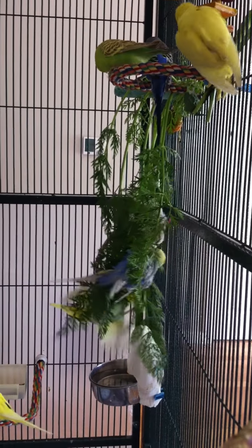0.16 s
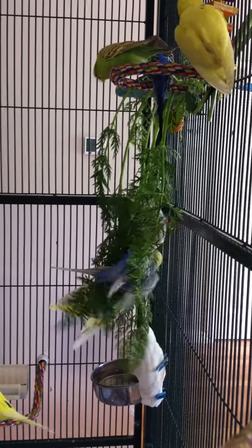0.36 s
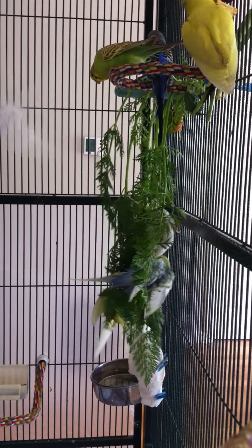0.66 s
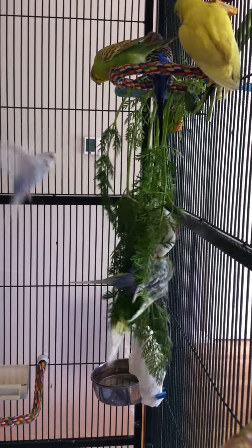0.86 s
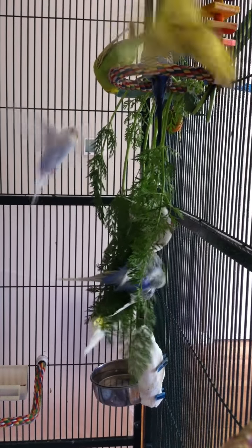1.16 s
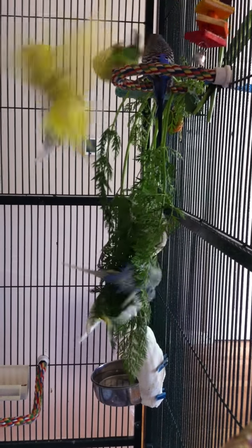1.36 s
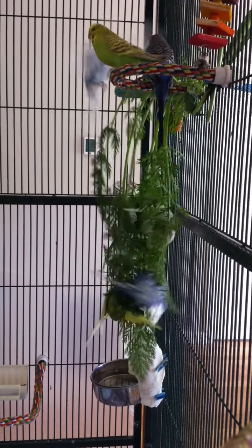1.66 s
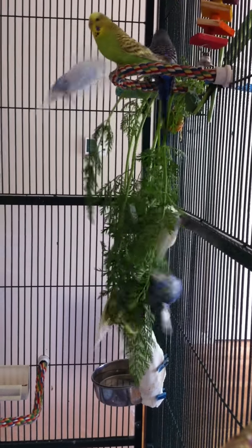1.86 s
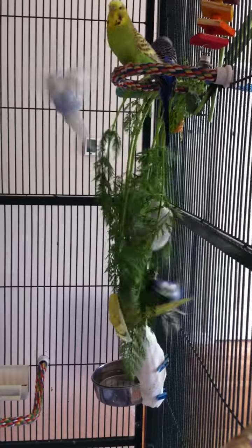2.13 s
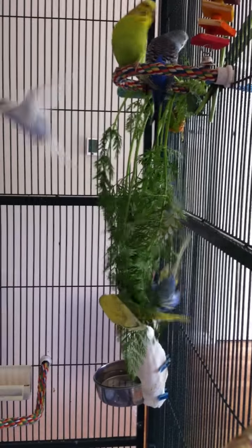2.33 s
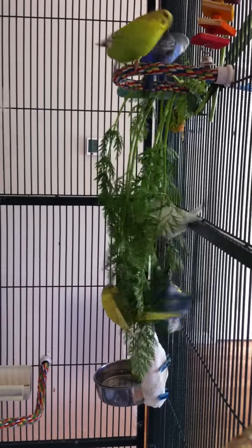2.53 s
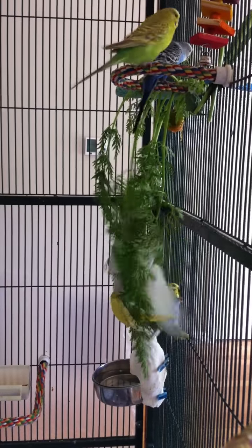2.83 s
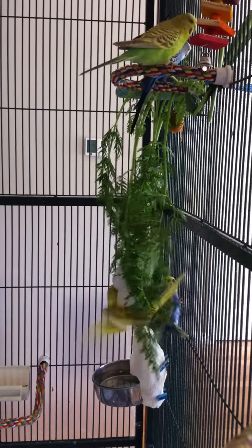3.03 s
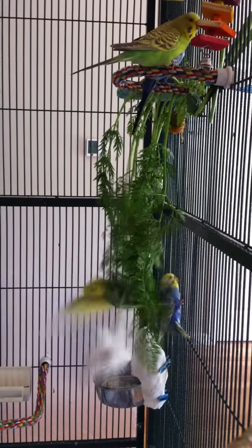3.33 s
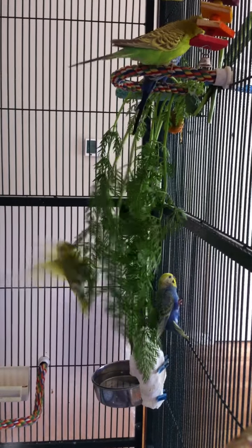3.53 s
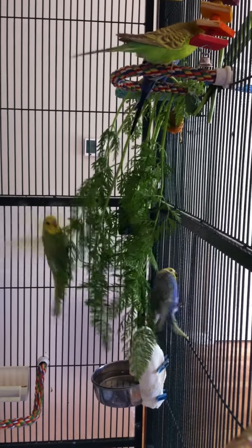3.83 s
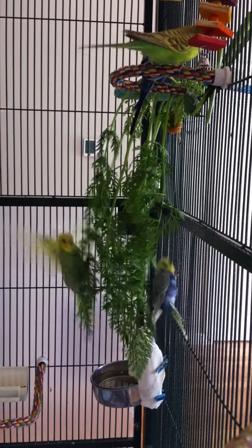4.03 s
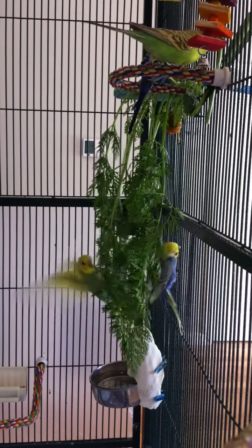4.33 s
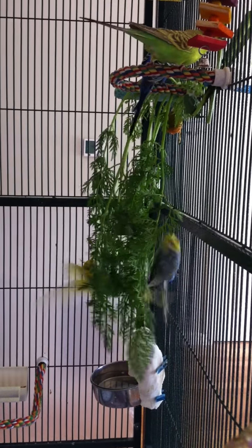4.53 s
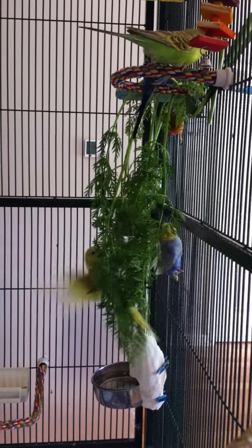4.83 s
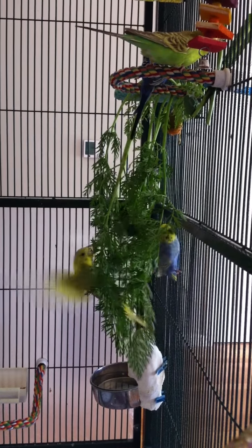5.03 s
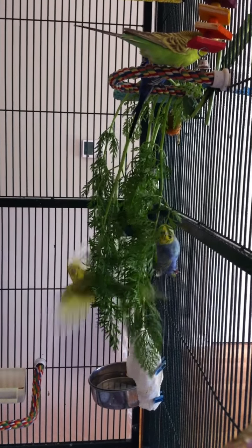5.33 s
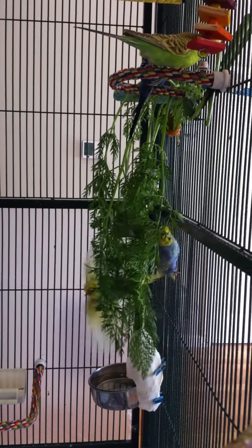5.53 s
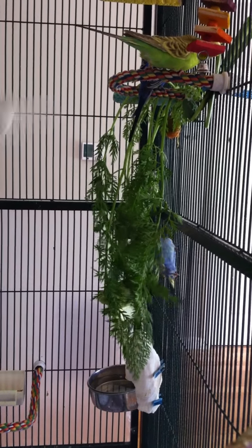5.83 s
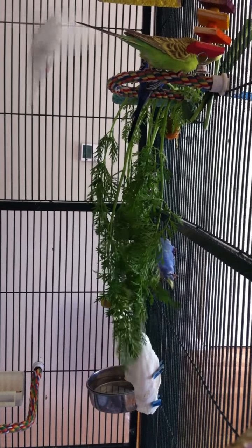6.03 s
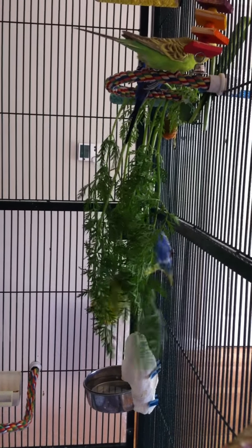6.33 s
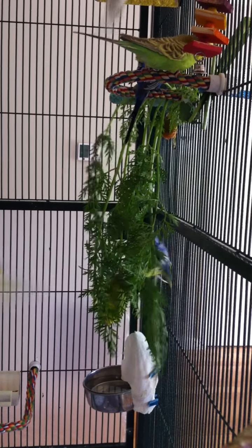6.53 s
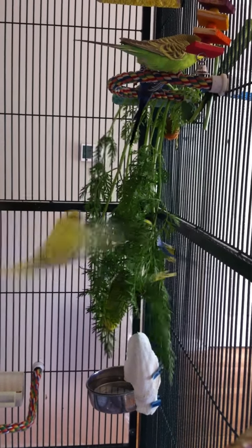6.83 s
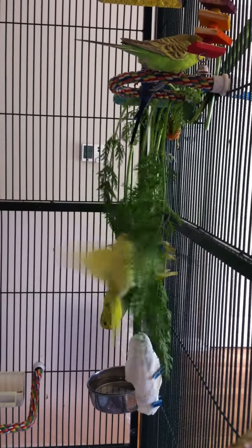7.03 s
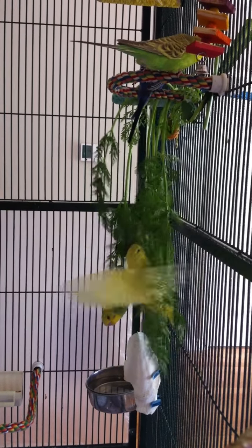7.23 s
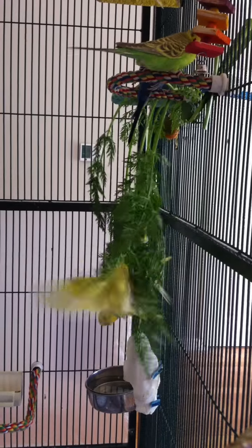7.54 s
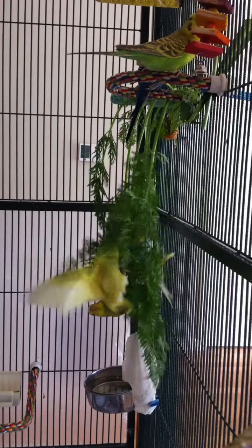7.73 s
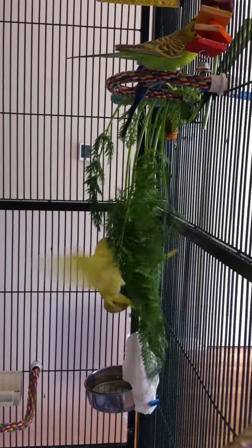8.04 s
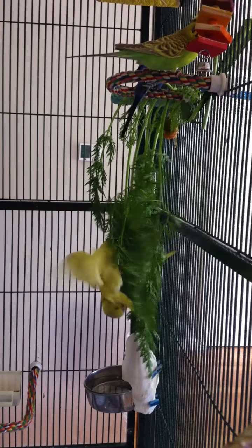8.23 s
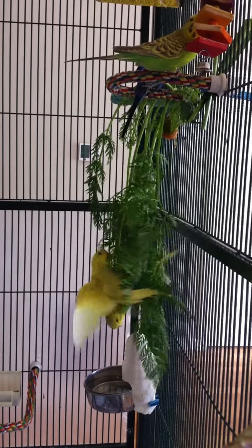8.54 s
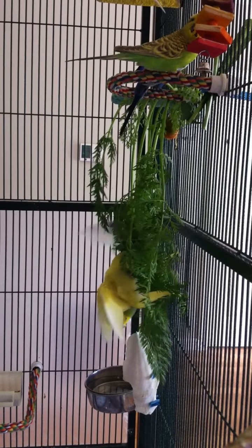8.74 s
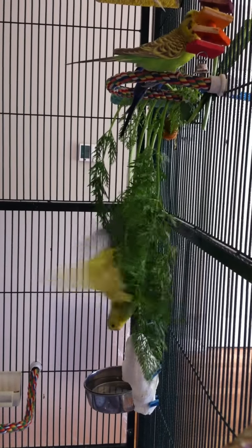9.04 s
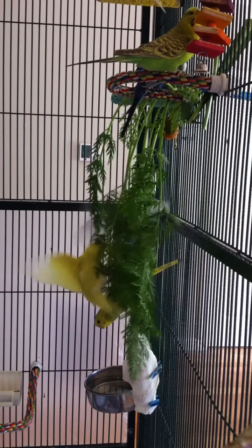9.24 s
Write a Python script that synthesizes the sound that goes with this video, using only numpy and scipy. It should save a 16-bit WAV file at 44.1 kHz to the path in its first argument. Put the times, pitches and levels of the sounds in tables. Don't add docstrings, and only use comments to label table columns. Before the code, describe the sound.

In a bare, ringing room, small parakeets scramble over hanging leaves in a wire cage, above faint room noise and a low appliance hum. It starts quietly with claw ticks; from 0.5 s wings puff and flutter, slapping leaves and bars as the foliage hisses and crackles. A longer whirr runs from about 1.5 to 2.4 s, with faint distant peeps. At 3.3 s come four quick, harsh yaps, then a strong wing burst and sharp slap near 3.7 s. Bright, fast-warbling whistles sound at 4.1, 4.3 and 4.9 s. Fluttering surges around 5.6 s with the hardest slap, followed by light ticks past 6 s. Two more whistles come at 7.0 and 7.25 s, then a low peep and scratchy farther call around 7.7 to 7.9 s. Soft low peeps follow at 8.6 s; the rustle thins, then a last flutter stirs at 9.2 s.

```python
import sys
import numpy as np
from scipy import signal
from scipy.fft import rfft, irfft
from scipy.io import wavfile
from scipy.ndimage import uniform_filter1d

SR = 44100
rng = np.random.default_rng(int(sys.argv[2]) if len(sys.argv) > 2 else 0)


def ratio_of_db(decibels):
    return 10 ** (np.asarray(decibels, float) / 20)


def waveform_to_disk(signal):
    frames = np.transpose(np.atleast_2d(signal))
    scaled = np.clip(frames, -1, 1) * 32767
    samples = np.round(scaled).astype(np.int16)
    wavfile.write(sys.argv[1], SR, samples)


N = 413658

# frequency in Hz, gain in dB.
THROAT_GAIN = [(300, -46.5), (900, -23.5), (1500, -15.5), (2500, 2), (3600, 2.5), (4500, -8.5),
               (7000, -1.5), (9000, -5.5), (10500, -8.5), (12300, -9.5), (14500, 9), (18000, -5)]
# time in seconds, level in dB.
LEAF_BUSTLE = [(0, -71), (.48, -72), (.59, -66.5), (.73, -66), (.86, -60.5), (2.4, -59), (3.12, -62),
               (3.23, -57.5), (3.9, -58), (4.06, -63.5), (5.58, -69), (5.69, -64.5), (5.9, -65.5),
               (6.98, -65), (8.1, -69.5), (8.68, -75), (8.98, -74.5), (9.38, -68)]


def rms_one(x):
    return x / np.sqrt(np.mean(x ** 2) + 1e-20)


def in_time(rows):
    s, *columns = np.transpose(rows)
    return [np.interp(np.arange(N) / SR, s, c) for c in columns]


def at_hz(points, hz):
    log_hz, gain = np.log(np.array(points)[:, 0]), np.array(points)[:, 1]
    return np.interp(np.log(hz + 1), log_hz, gain)


def drift(rate, size=N):
    r = np.exp(-2 * np.pi * rate / SR)
    noise = rng.standard_normal(size + 20000)
    return rms_one(signal.lfilter([1], [1, -2 * r, r * r], noise)[20000:])


def coloured(x, spectrum):
    hz = np.arange(N // 2 + 1) * SR / N
    return rms_one(irfft(rfft(x) * ratio_of_db(at_hz(spectrum, hz)), N))


def band(x, low_hz, high_hz):
    return signal.sosfilt(signal.butter(2, [low_hz, high_hz], "band", fs=SR, output="sos"), x)


def voice(calls, tract, second_db, slope_db, breath_db):
    break_db = -5
    out = np.zeros(N)
    wobble = np.tanh(drift(410))
    stutter = np.abs(drift(110))
    fray = np.tanh(drift(180))
    air = ratio_of_db(breath_db) * coloured(rng.standard_normal(N), tract)
    for notes in calls:
        s, length, from_hz, to_hz, effort_db, flutter = np.transpose(notes)
        knots = np.ravel([s, s + length], "F")
        at = np.arange(int(s[0] * SR) - 200, int(knots[-1] * SR) + 200)
        t = at / SR
        rough = np.interp(t, knots, np.repeat(np.clip(flutter, .15, 1), 2))
        glide = np.interp(t, knots, np.ravel([from_hz, to_hz], "F"))
        hz = signal.lfilter([.03], [1, -.97], glide, zi=[from_hz[0]])[0]
        hz = hz * (1 + .12 * rough * wobble[at])
        shake_db = 25 * rough * (.6 - stutter[at])
        held = uniform_filter1d(1. * (np.searchsorted(knots, t) % 2), size=90)
        edge = np.clip((t - t[0]) / 0.012, 0, 1) ** 0.58 * np.clip((t[-1] - t) / 0.011, 0, 1)
        push_db = np.interp(t, knots, np.repeat(effort_db, 2)) + 3.0
        level = ratio_of_db(push_db + shake_db + break_db * (1 - held)) * edge
        phase = 2 * np.pi * np.cumsum(hz) / SR
        tone = air[at]
        for k in range(1, 9):
            tilt_db = 0
            if k > 1:
                tilt_db = second_db * np.clip(hz / 2600, .3, 1) + slope_db * (k - 2)
                tilt_db = tilt_db - 9.0 * (k - 1) * (rough - .15) + 7 * fray[at - 3000 * k]
            tone = tone + ratio_of_db(tilt_db + at_hz(tract, k * hz)) * (k * hz < 17000) * np.sin(k * phase)
        out[at] += level * tone
    return out


def sung(tune, calls):
    fall_flutter = 0.23
    return [[(s + at * slow, length * slow, a * high, b * high, db + effort_db,
              flutter + fall_flutter * max(1 - b / a, 0))
             for at, length, a, b, effort_db in tune]
            for s, slow, high, db, flutter in calls]


def facing_calls():
    # seconds after the start, length in seconds, from Hz, to Hz, effort in dB.
    tune = [
        (0, 0.01197, 2279, 2637, -2),
        (.013, 0.014, 2755, 2751, -1),
        (.035, .018, 3747, 3515, .3),
        (.056, .018, 3360, 2440, -0.7),
        (.078, .016, 1500, 1970, -1),
        (.098, .031, 2625, 2940, 0.3),
        (.132, .024, 2976, 3394, 1.3),
    ]
    # start in seconds, stretch of time, stretch of pitch, effort in dB, flutter from 0 to 1.
    times = [
        (4.873, .995, 1, -21, 0.15),
        (7.004, 1.01, 0.98, -22, 0.18),
        (7.259, 1.025, 1.005, -22.5, 0.18),
    ]
    return voice(sung(tune, times), THROAT_GAIN, second_db=-15.0, slope_db=-6, breath_db=-28.5)


def turned_calls():
    # seconds after the start, length in seconds, from Hz, to Hz, effort in dB.
    tune = [
        (0, 0.024, 2365, 2747, -9.5),
        (.0305, 0.024, 3670, 3574, -2.7),
        (.050, .021, 3431, 2483, -2.5),
        (.075, 0.021, 1312, 1845, -2),
        (.109, .025, 2757, 2890, -0.9),
        (.137, 0.014, 3200, 3485, 1.5),
    ]
    # start in seconds, stretch of time, stretch of pitch, effort in dB, flutter from 0 to 1.
    times = [
        (4.087, 1.002, 1.015, -22, .2),
        (4.33, .998, 1.003, -24, .17),
    ]
    return voice(sung(tune, times), THROAT_GAIN, second_db=-17.5, slope_db=-4.5, breath_db=-23)


def far_calls():
    # start in seconds, length in seconds, from Hz, to Hz, effort in dB.
    parts = [
        [(7.748, .007, 3514, 3287, -35), (7.756, .008, 3007, 2150, -40.5), (7.765, .012, 1963, 1705, -28.5)],
        [(7.76, .028, 4000, 3330, -42)],
        [(7.792, .022, 2800, 2440, -37), (7.823, .020, 4000, 3396, -34.5), (7.849, .016, 1950, 1662, -29.5),
         (7.871, 0.0268, 2700, 2796, -36.5), (7.903, .028, 2796, 3268, -31)],
    ]
    flutter = 0.29
    calls = [[(*note, flutter) for note in part] for part in parts]
    far = voice(calls, THROAT_GAIN, second_db=-20, slope_db=-2.5, breath_db=-14)
    return band(far, 300, 9500)


def yaps():
    # start in seconds, pitch in Hz, effort in dB.
    starts = [
        (3.314, 2263, -43.5),
        (3.383, 2270, -42),
        (3.439, 2270, -37),
        (3.500, 1870, -38),
    ]
    scoop_s, scoop_from, scoop_db = .007, .7, -5.0
    hold_s, sag, flutter = .015, .96, .25
    return [[(s, scoop_s, scoop_from * hz, 0.87 * hz, db + scoop_db, flutter),
             (s + scoop_s + 0.0015, hold_s, hz, sag * hz, db, flutter)] for s, hz, db in starts]


def harsh_chatter():
    # frequency in Hz, gain in dB.
    rasp = [(600, -31.5), (1700, -2), (2400, -2.5), (2900, -9.5), (3600, -3), (4600, -5.5), (7000, -5.5),
            (9300, -4.5), (12000, -13), (16000, -15.5)]
    return voice(yaps(), rasp, second_db=1.5, slope_db=-2.0, breath_db=-5)


def far_peeps():
    # start in seconds, length in seconds, from Hz, to Hz, effort in dB.
    notes = [
        (1.762, 0.07, 3307, 3270, -69),
        (2.893, .1, 3300, 3230, -71.5),
        (3.17, .025, 2300, 2250, -58),
        (7.723, 0.023, 1253, 1525, -32),
        (8.602, 0.021, 1372, 1560, -45),
        (8.673, 0.028, 1061, 1190, -46.5),
    ]
    flutter = 0.45
    calls = [[(*note, flutter)] for note in notes]
    peeps = voice(calls, THROAT_GAIN, second_db=-45.5, slope_db=-10.5, breath_db=-15.5)
    return band(peeps, 300, 5000)


def flight():
    # start in seconds, held seconds, air puffs in dB, feather whirr in dB, whirr centre in Hz.
    bouts = [(.56, 0.05, -57.5, -74.5, 429.5), (.68, 0.02, -57, -70, 449.2), (.81, 0.19, -48, -57.5, 510),
             (1.5, 0.21, -52.5, -53.5, 490), (1.76, .56, -51, -47.5, 481.5), (2.66, 0.022, -52.5, -68, 506),
             (3.26, 0.023, -50.5, -77, 493), (3.5, 0.098, -48, -58, 485.5), (3.699, 0.049, -44, -46, 500),
             (4.219, .05, -51.5, -52.5, 475), (4.6, 0.012, -58, -57.5, 473), (4.911, .02, -52, -69.5, 459),
             (5.0, 0.067, -59, -57, 486), (5.349, 0.025, -56, -59.5, 455), (5.58, 0.21, -47, -52, 502.5),
             (6.552, 0.018, -54, -65, 502), (6.839, .02, -53, -64, 480), (7.0, 0.027, -55.5, -61, 529),
             (9.18, .04, -57, -70, 490)]
    rise_db_per_s, fall_db_per_s, sag_hz_per_s = 128.5, 61, 18
    t = np.arange(0, N, 64) / SR
    bustle_db, = in_time(LEAF_BUSTLE)
    s, held, air_db, whirr_db, hz = np.transpose(bouts)[:, :, None]
    loss_db = rise_db_per_s * np.clip(s - t, 0, None) + fall_db_per_s * np.clip(t - s - held, 0, None)
    idle_db = -60 + 0.7 * (bustle_db[::64] - bustle_db.mean())
    ruling = np.argmax(whirr_db - loss_db, axis=0), np.arange(len(t))
    centre = (hz - sag_hz_per_s * np.clip(t - s, 0, held))[ruling]
    air = np.maximum((air_db - loss_db).max(axis=0), idle_db)
    whirr = np.maximum((whirr_db - loss_db)[ruling], idle_db - 26.5)
    return in_time(np.transpose([t, air, whirr, uniform_filter1d(centre, size=20)]))


def wings():
    # frequency in Hz, density in dB per Hz.
    puff_spectrum = [(18, -64), (30, -25.5), (97, -3), (165, 6), (364, -0.5), (526, 1), (709, -1.5),
                     (876, -5), (2000, -9.5), (2600, -43.5), (4400, -120)]
    beats_per_s, whirr_width_hz = 16, 76
    puff_db, whirr_db, whirr_hz = flight()
    beat = np.cos(2 * np.pi * np.cumsum(beats_per_s * (1 + .1 * drift(1.66))) / SR)
    puff_level = ratio_of_db(puff_db - 6.0 + 3.1 * beat + 0.77 * drift(5.5))
    puffs = puff_level * coloured(rng.standard_normal(N), puff_spectrum)
    phase = 2 * np.pi * np.cumsum(whirr_hz) / SR
    whirr = drift(whirr_width_hz) * np.cos(phase) + drift(whirr_width_hz) * np.sin(phase)
    return puffs + ratio_of_db(whirr_db - 9.5 + 2.0 * beat) * whirr


def touches():
    # start in seconds, peak in dB, middle share in dB, t60 in seconds.
    firm = [(.5403, -44.5, -15, 0.17), (.6795, -28, -7.5, 0.076), (.8416, -29, -29, 0.19),
            (1.2392, -27.5, -23, 0.021), (1.4348, -39, -31, .06), (1.5924, -52, 8, 0.066),
            (1.6358, -36, -9, 0.052), (1.8762, -50, 10, 0.088), (2.3123, -37.5, -1.5, 0.07),
            (2.4539, -39, -1, 0.082), (2.6729, -44, 9, 0.1), (2.7009, -46.5, 8, .06),
            (3.133, -46, 3.5, .12), (3.2696, -35.5, 3.5, 0.12), (3.6132, -32.5, -19, .06),
            (3.716, -23, -3.5, 0.025), (3.7709, -33, -5, 0.051), (5.1318, -35, -10, 0.056),
            (5.3313, -31.5, -4, 0.13), (5.4775, -36, -7, 0.053), (5.5054, -34, -5, 0.033),
            (5.5678, -35.5, -4, 0.13), (5.6216, -18, -10, 0.022), (6.4747, -38, -5.5, 0.094),
            (8.9619, -45.5, 2.5, 0.067), (9.1764, -38, -4.5, 0.12)]
    # start in seconds, stroke in seconds, lasting seconds,
    # first peak in dB, middle share in dB.
    beat_runs = [
        (.9325, .0572, .26, -39.5, -11),
        (2.003, .061, .27, -44, -7),
        (5.6765, .0558, .25, -34.5, -2),
    ]
    # start in seconds, peak in dB.
    light_ticks = [(.3058, -53), (.3886, -53.5), (2.5886, -41), (2.797, -49), (3.177, -46), (3.8257, -49),
                   (4.0158, -52), (5.2687, -42), (6.026, -54), (6.0717, -42.5), (6.143, -46), (6.1694, -44),
                   (6.2427, -46), (6.2736, -41.5), (6.3265, -44), (6.559, -46), (6.8389, -48), (8.1803, -48.5),
                   (8.3505, -50.5), (8.4432, -60.5), (9.129, -49)]
    run_loss_db, tick_middle_db, light_t60_s = 1.6, -3, 0.073
    runs = [(s + at, db - run_loss_db * k, mid_db, light_t60_s)
            for s, stroke, lasting, db, mid_db in beat_runs
            for k, at in enumerate(np.arange(0, lasting, stroke))]
    return [*firm, *runs, *[(s, db, tick_middle_db, light_t60_s) for s, db in light_ticks]]


def slaps():
    bands_hz = [(7340, 20400), (4000, 7200), (1010, 4000), (154.2, 1100)]
    bright, upper, middle, dull = (rms_one(band(rng.standard_normal(N), a, b)) for a, b in bands_hz)
    upper_tilt = .4
    out, t = np.zeros(N), np.arange(6000) / SR
    rows = touches()
    low_shares_db = -10.5 + 4.5 * rng.standard_normal(len(rows))
    for (s, peak_db, mid_db, t60), low_db in zip(rows, low_shares_db):
        at = slice(int(s * SR), min(int(s * SR) + len(t), N))
        decay = ratio_of_db(-60 * t / max(t60, .01)) + 0.68 * ratio_of_db(-60 * t / 0.014)
        fade = np.clip(t / 0.00059, 0, 1) * ratio_of_db(peak_db - 12.0) * decay
        burst = bright[at] + ratio_of_db(upper_tilt * mid_db - 5) * upper[at]
        burst = burst + ratio_of_db(mid_db) * middle[at] + ratio_of_db(low_db) * dull[at]
        out[at] += fade[:at.stop - at.start] * burst
    return out


def leaves():
    # frequency in Hz, density in dB per Hz.
    leaf_spectrum = [(410, -30), (700, -6.5), (886, -0.5), (1310, -5.5), (1870, -2.5), (5400, -8),
                     (10700, -7.5), (15000, -8.5), (16000, -18)]
    level_db, = in_time(LEAF_BUSTLE)
    sizes = ratio_of_db(9.7 * np.minimum(rng.exponential(1, N), 4)) * rng.choice([-1, 1], N)
    grains = rms_one(sizes * (rng.random(N) < 900 * ratio_of_db(5 * drift(15)) / SR))
    hiss = rng.standard_normal(N) * ratio_of_db(1.2 * drift(24))
    return ratio_of_db(level_db + 4.0) * coloured(hiss + .4 * grains, leaf_spectrum)


def room(x):
    # frequency in Hz, t60 in seconds.
    room_t60 = [(100, 1), (1500, 0.67), (2200, 0.66), (3000, 0.64), (4000, 0.76), (6500, 0.54),
                (14000, 0.37)]
    # delay in seconds, level in dB.
    near_walls = [(.0031, -9.5), (.0074, -6), (0.0098, -19), (0.0173, -13), (0.0236, -9)]
    t, edges = np.arange(SR) / SR, 60 * 2 ** np.arange(0, 8.6, .5)
    echoes = rng.standard_normal(SR) * ratio_of_db(2.86 * drift(470, SR)) * np.clip(t / 0.0039 - 1, 0, 1)
    tail = sum(band(echoes, a, b) * ratio_of_db(-60 * t / at_hz(room_t60, np.sqrt(a * b)))
               for a, b in zip(edges, edges[1:]))
    tail = tail / np.sqrt(np.sum(tail ** 2))
    for delay, level_db in near_walls:
        tail[int(delay * SR)] += ratio_of_db(level_db)
    return signal.fftconvolve(x, tail)[:N]


def background():
    # frequency in Hz, density in dB per Hz.
    floor_spectrum = [(25, -26), (60, -34), (130, -18.5), (200, -3), (350, -7.5), (700, -16.5),
                      (1100, -36.5), (4000, -21.5), (8000, -27.5), (13000, -23.5), (17000, -28.5)]
    hum_hz, hum_db, floor_db = 341.5, -67.5, -71
    phase = 2 * np.pi * np.cumsum(hum_hz + 0.45 * drift(3.6)) / SR
    hum = ratio_of_db(hum_db + 2.5 + 0.91 * drift(4.7)) * np.sin(phase)
    return ratio_of_db(floor_db + 1.5) * coloured(rng.standard_normal(N), floor_spectrum) + hum


def scene():
    turned = turned_calls()
    facing = facing_calls()
    far = far_calls()
    chatter = harsh_chatter()
    peeps = far_peeps()
    hits = slaps()
    sent = ratio_of_db(-2.0) * turned + ratio_of_db(-6.5) * facing + ratio_of_db(-2.5) * far
    sent = sent + ratio_of_db(-1.5) * (chatter + peeps) + ratio_of_db(-3.5) * hits
    direct = turned + facing + far + chatter + peeps + hits
    return (direct + room(sent) + wings() + leaves() + background())[None]


def drop_faint_bands(x):
    below_db, from_hz, bins = 42, 4300, 16
    hz, _, z = signal.stft(x, SR, window="cosine", nperseg=2048, noverlap=1024)
    power = np.add.reduceat(np.abs(z) ** 2, np.arange(0, len(hz), bins), axis=1)
    heard = power > power.max(axis=1, keepdims=True) * ratio_of_db(-2 * below_db)
    keep = np.repeat(heard, bins, axis=1)[:, :len(hz)] | (hz < from_hz)[:, None]
    return signal.istft(z * keep, SR, window="cosine", nperseg=2048, noverlap=1024)[1][:, :N]


def low_pass(x):
    return signal.sosfilt(signal.butter(12, 16820, fs=SR, output="sos"), x)


def record(dry):
    thin = signal.sosfilt(signal.butter(1, 90, "high", fs=SR, output="sos"), dry)
    cut = signal.sosfilt(signal.ellip(12, .5, 60, 16000, fs=SR, output="sos"), thin)
    return low_pass(drop_faint_bands(cut))


dry = scene()
out = record(dry)
waveform_to_disk(out)
```